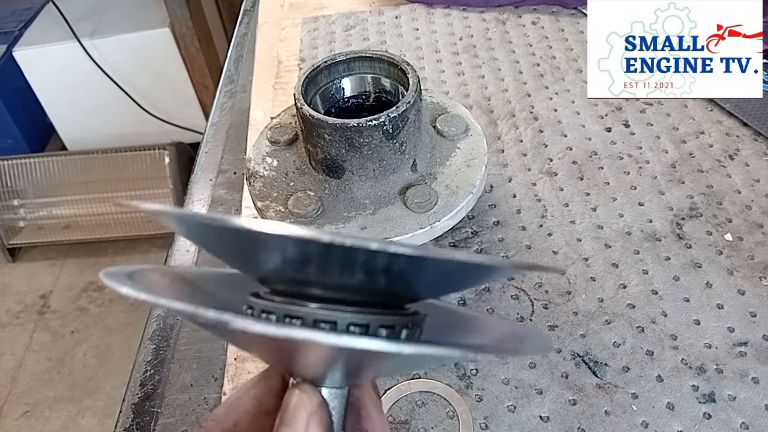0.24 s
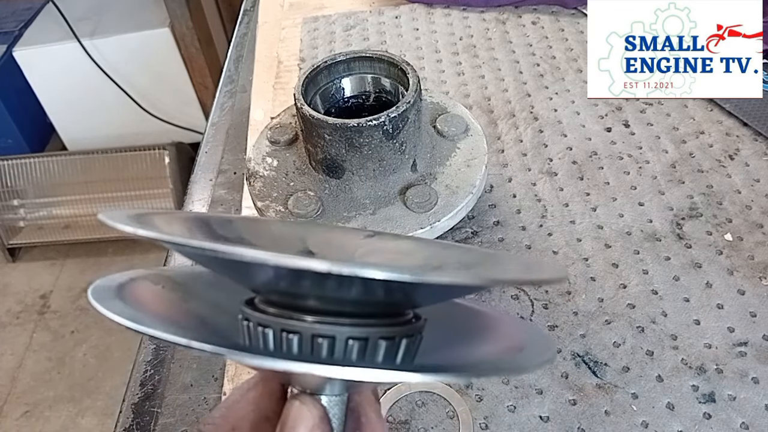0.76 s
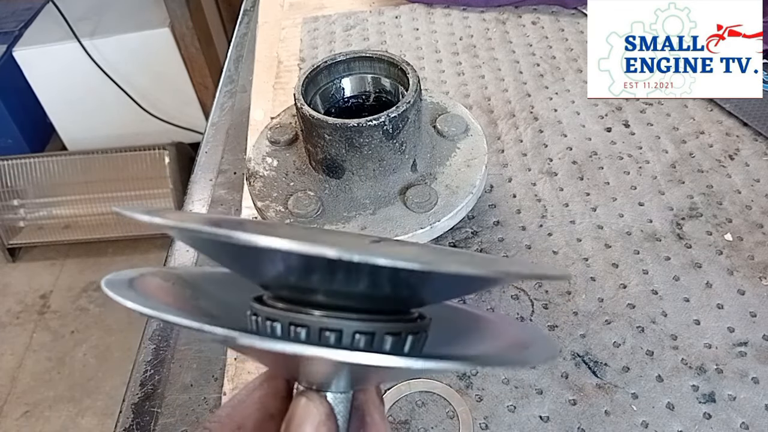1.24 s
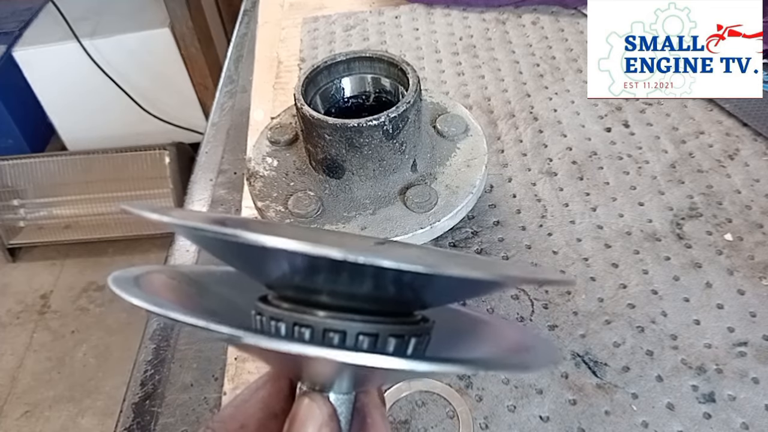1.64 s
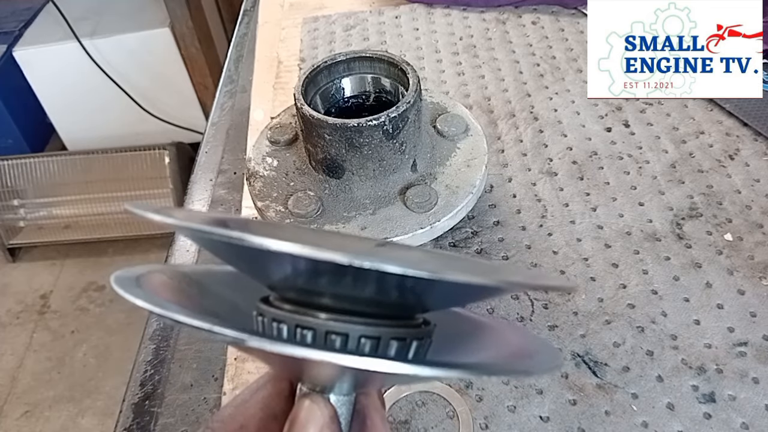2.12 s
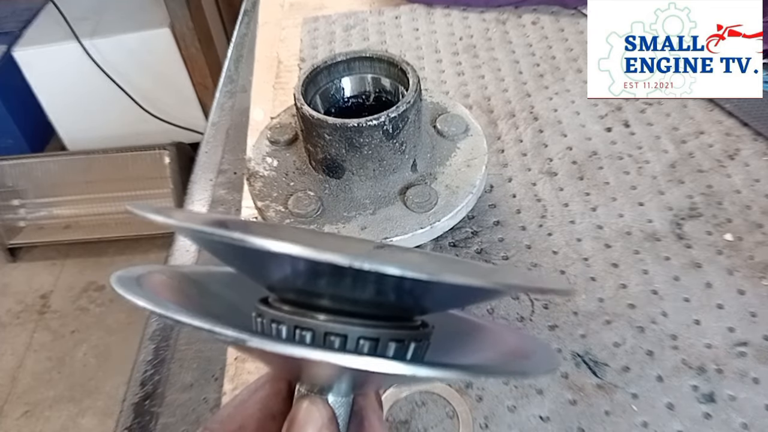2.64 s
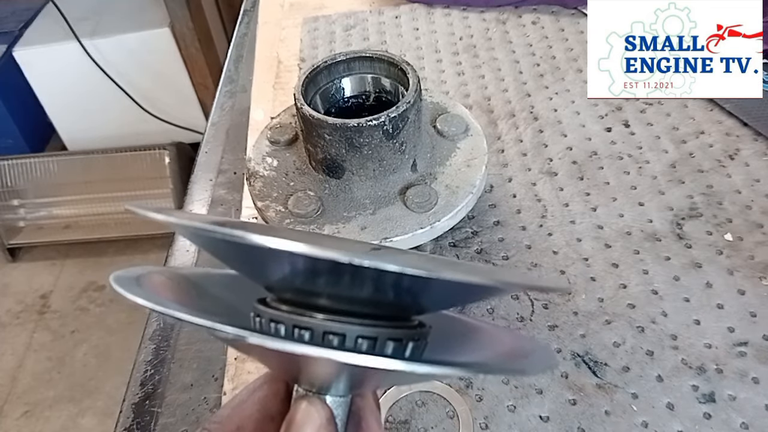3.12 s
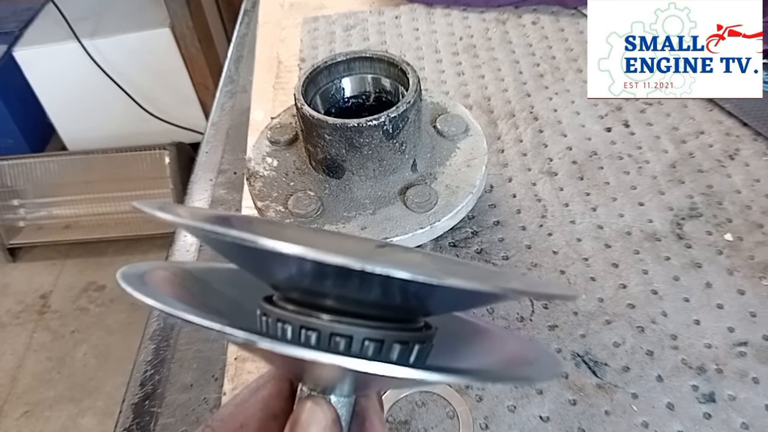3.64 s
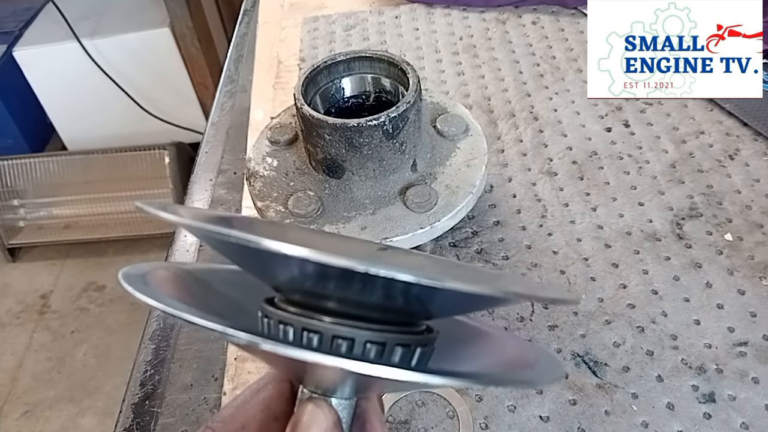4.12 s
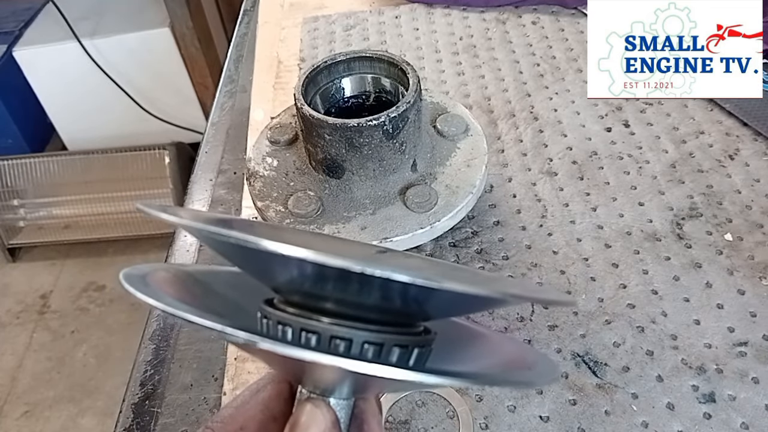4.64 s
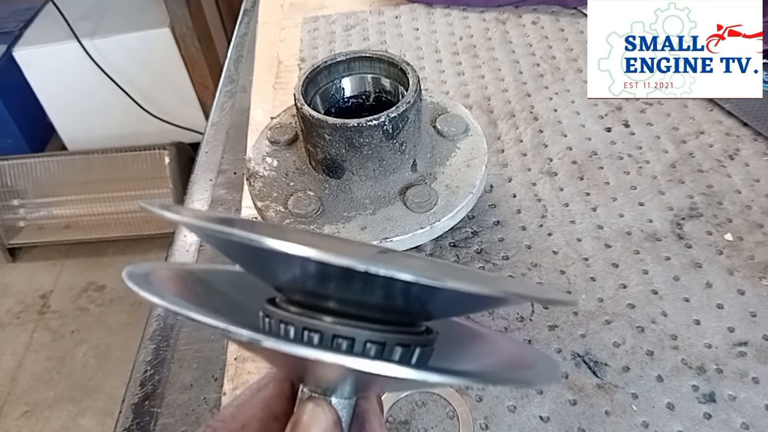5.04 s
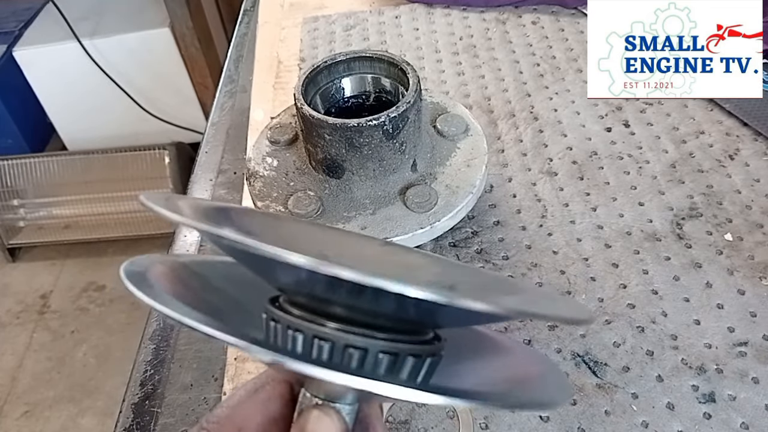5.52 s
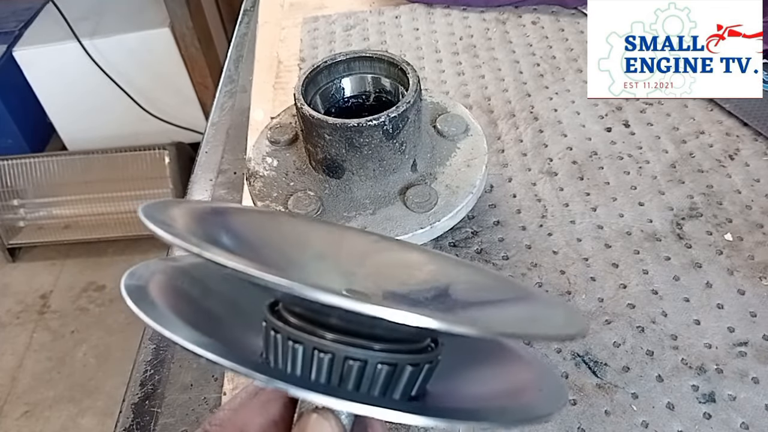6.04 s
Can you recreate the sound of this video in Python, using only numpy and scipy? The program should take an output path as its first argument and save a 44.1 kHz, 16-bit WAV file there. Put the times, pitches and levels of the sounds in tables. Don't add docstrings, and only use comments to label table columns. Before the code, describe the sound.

Four trigger pulls of an air-powered grease gun, hissing and hammering rhythmically, the third hardest, over a quiet shop hum and faint hose leak.

```python
import sys
import numpy as np
from scipy import signal
from scipy.fft import rfft, irfft, next_fast_len
from scipy.io import wavfile
from scipy.ndimage import uniform_filter1d

SR = 44100
rng = np.random.default_rng(int(sys.argv[2]) if len(sys.argv) > 2 else 0)


def gain_from_db(level_db):
    decades = np.asarray(level_db, float) / 20
    return 10 ** decades


def to_wav(s):
    ch = np.atleast_2d(s).T
    pcm = np.round(np.clip(ch, -1, 1) * 32767)
    wavfile.write(sys.argv[1], SR, pcm.astype(np.int16))


N = 276948
TIME = np.arange(N) / SR
EDGE_DB = 30
OPEN_S, SHUT_S = 0.005, 0.03


def curve(tables, column, rest):
    out = np.full(N, rest, float)
    for rows in map(np.array, tables):
        inside = slice(*np.searchsorted(TIME, rows[[0, -1], 0]))
        course = np.interp(TIME[inside], rows[:, 0], rows[:, column])
        out[inside] = np.maximum(out[inside], course)
    return out


def unit(x):
    return x / np.sqrt(np.mean(x ** 2))


def noise(spectrum):
    hz, db = np.transpose(spectrum)
    size = next_fast_len(N)
    bins_hz = np.maximum(np.arange(size // 2 + 1) * SR / size, 1)
    gain = gain_from_db(np.interp(np.log(bins_hz), np.log(hz), db, left=-99, right=-99))
    return unit(irfft(rfft(rng.standard_normal(size)) * gain, size)[:N])


def walk(rate_hz):
    held = int(SR / rate_hz)
    stairs = np.repeat(rng.standard_normal(N // held + 1), held)
    return unit(uniform_filter1d(uniform_filter1d(stairs, held), held)[:N])


def band(x, hz, width_hz):
    return signal.lfilter(*signal.iirpeak(hz, hz / width_hz, SR), x)


def band_twice(x, hz, width_hz):
    return band(band(x, hz, width_hz), hz, width_hz)


def ring(modes):
    t = TIME[:SR // 2]
    return [gain_from_db(db - 60 * t / t60) * np.sin(2 * np.pi * hz * t) for hz, db, t60 in modes]


def blows(times_s, sizes):
    out = np.zeros(N)
    np.add.at(out, (np.asarray(times_s) * SR).astype(int), sizes)
    return out


def through(x, response):
    return signal.fftconvolve(x, response)[:N]


def reflections(t60_s, start_s):
    t = TIME[:SR // 2]
    echoes = rng.standard_normal(len(t)) * gain_from_db(-60 * t / t60_s) * (t > start_s)
    return echoes / np.sqrt(np.sum(echoes ** 2))


def puffs(rows):
    shapes = []
    for s, rise, hold, fall, db in rows:
        shapes.append([(s - rise, db - EDGE_DB), (s, db), (s + hold, db),
                       (s + hold + 2 * fall, db - 2 * EDGE_DB)])
    return curve(shapes, column=1, rest=-120)


def flow_db(sizzle):
    # (open [s], shut [s], hiss at opening [dB], hiss at shutting [dB],
    # valve-seat sizzle over the hiss [dB])
    openings = [
        (1.071, 1.715, -27.5, -28, -9),
        (2.072, 2.906, -28.5, -30, -9),
        (2.945, 2.974, -36, -32, -18),
        (3.166, 3.57, -31.5, -32, -3.5),
        (3.556, 4.148, -26, -22, -4),
        (4.627, 4.932, -26, -34, -6.5),
        (4.936, 5.292, -32.5, -27, -8.5),
        (5.29, 5.506, -35, -37.5, -7),
    ]
    shapes = []
    for opened, shut, first_db, last_db, sizzle_db in openings:
        extra_db = sizzle * sizzle_db
        shapes.append([(opened - OPEN_S, first_db - EDGE_DB + extra_db), (opened, first_db + extra_db),
                       (shut, last_db + extra_db), (shut + SHUT_S, last_db - EDGE_DB + extra_db)])
    return curve(shapes, column=1, rest=-120)


def shop():
    # (frequency [Hz], level [dB/Hz])
    hum_colour = [(30, -16), (55, -6), (68, 4), (85, -15.5), (110, -19.5)]
    # (time [s], level [dB])
    hum_course = [(0, -40), (1, -46.5), (1.9, -54), (3.1, -44), (4.4, -54), (5.6, -46), (6.28, -54)]
    # (frequency [Hz], level [dB/Hz])
    murmur_colour = [(56, -36), (95, -0.5), (113, -10.5), (139, -6.5), (209, -9.5), (358, -20), (388, -21),
                     (692, -22), (2200, -34.5), (2860, -63), (4840, -120)]
    # (frequency [Hz], level [dB/Hz])
    leak_colour = [(1180, -52.5), (2000, -19.5), (2400, -18), (2570, -9), (2780, -12), (3260, -3.5),
                   (3550, -9), (3870, -8), (5490, -16.5), (6880, -10.5), (7570, -15), (8630, -2.5),
                   (10800, -21.5), (13000, -13), (16000, -16.5)]
    murmur_db, leak_db = -48, -45
    duck_db, duck_s = -8, 0.21
    busy = uniform_filter1d(1.0 * (flow_db(False) > -2 * EDGE_DB), int(duck_s * SR))
    hum_db = curve([hum_course], column=1, rest=-120) + duck_db * busy + 1.9 * walk(5.6)
    hum = gain_from_db(hum_db) * noise(hum_colour)
    murmur = gain_from_db(murmur_db - 1.5 + 1.3 * walk(6.2)) * noise(murmur_colour)
    hiss = noise(leak_colour)
    leak = unit(hiss + 0.68 * through(hiss, reflections(0.053, 0.00084)))
    return hum + murmur + gain_from_db(leak_db + 0.14 * walk(2.78)) * leak


def air(chuff):
    # (time [s], hold [s], fall [s], level [dB])
    drains = [
        (0.797, 0.25, .05, -49),
        (1.74, .01, 0.48, -35),
        (1.834, .01, 0.32, -32.5),
        (2.89, .01, .15, -29),
        (2.97, .01, 0.72, -38.5),
        (4.157, 0.0081, 0.58, -35),
        (5.298, .2, .07, -30.5),
        (5.51, .01, 0.28, -42.5),
    ]
    # (frequency [Hz], level [dB/Hz])
    nozzle_colour = [(1100, -16), (2200, -7.5), (2750, -2.5), (4200, 0.5), (5300, -2.5), (5750, -6.5),
                     (8600, -6), (14000, -26)]
    # (time [s], level [dB])
    spits = [
        (1.076, -14),
        (2.076, -19),
        (3.17, -16.5),
        (4.627, -18.5),
    ]
    # (frequency [Hz], level [dB/Hz])
    spit_colour = [(3600, -25), (4500, -2.5), (5500, -7.5), (7200, -2.5), (8000, -16)]
    # (peak [s], rise [s], hold [s], fall [s], hiss [dB])
    surges = [
        (1.074, .005, 0.081, 0.16, -19.5),
        (1.693, 0.18, 0.0066, 0.17, -24.5),
        (2.075, .005, 0.011, .4, -20.5),
        (2.87, 0.038, 0.0026, .08, -18.5),
        (3.169, 0.0054, .03, 0.21, -21),
        (4.095, 0.041, 0.063, .022, -29),
        (4.627, .005, 0.009, 0.15, -21),
        (5.255, .015, 0.028, 0.035, -25.5),
    ]
    # (frequency [Hz], level [dB/Hz])
    fine_colour = [(2940, -22.5), (5000, -5.5), (5650, -9), (6630, -7.5), (6760, -7), (7790, -3),
                   (8090, -1), (8790, 0), (10200, -10.5), (14900, -12), (16000, -9.5)]
    # (frequency [Hz], level [dB/Hz])
    roar_colour = [(1000, -12), (1700, -7), (2050, -3), (2650, -0.5), (2870, -1.5), (3830, 1), (4890, -3.5),
                   (5600, -33), (7280, -32), (12300, -120)]
    # (frequency [Hz], level [dB/Hz])
    breath_colour = [(150, -25), (300, 0.5), (700, -0.5), (1200, 1), (2000, -16.5), (2600, -42)]
    sizzle_colour = [(7000, -19), (7900, -11.0), (8600, 1), (9300, -6.5), (10000, -30.5)]

    steady, surge = gain_from_db(flow_db(False)), gain_from_db(puffs(surges))

    def strength(steady_db, surge_db):
        return np.hypot(steady * gain_from_db(steady_db), surge * gain_from_db(surge_db))

    drain_db = puffs([(s, SHUT_S, hold, fall, db) for s, hold, fall, db in drains])
    drain = gain_from_db(drain_db + 1.6 * walk(25.03)) * noise(nozzle_colour)
    spit_db = puffs([(s, OPEN_S, 0.011, 0.026, db) for s, db in spits])
    spit = gain_from_db(spit_db) * noise(spit_colour)
    fine = strength(0, 0) * gain_from_db(1.0 * walk(40)) * noise(fine_colour) * (0.85 + 0.5 * chuff)
    roar = strength(-2.5, -5.5) * gain_from_db(1.2 * walk(30)) * noise(roar_colour) * (0.77 + 1.24 * chuff)
    breath = strength(-12, -13) * gain_from_db(0.96 * walk(30)) * noise(breath_colour) * (0.61 + 2.0 * chuff)
    seat = np.hypot(gain_from_db(flow_db(True)), surge * gain_from_db(-12))
    sizzle = seat * gain_from_db(0.63 * walk(40)) * noise(sizzle_colour)
    return fine + roar + breath + sizzle + drain + spit


def choke_db():
    lock_s, rise_s, hold_s, fall_s, damping_db = 4.165, 0.06, 0.4, 0.01, -18
    return damping_db * gain_from_db(puffs([(lock_s, rise_s, hold_s, fall_s, 0)]))


def piston():
    # (time [s], knock [dB], barrel ring [dB], return blow after [s])
    strokes = [(1.07, -19, -28, 0.07), (1.533, -25, -32.5, 0.045), (2.0718, -32, -27, 0.046),
               (2.2126, -23, -26.5, .048), (2.3456, -13, -27, .042), (2.4811, -13.5, -29.5, 0.037),
               (2.6154, -16, -27, .042), (2.7525, -12.5, -27, 0.044), (2.936, -10, -27.5, 0.037),
               (3.1672, -37, -20, .042), (3.311, -14.5, -28.5, .048), (3.4398, -15, -26, 0.051),
               (3.5694, -1.5, -17.5, 0.042), (3.7, 0.5, -15.5, 0.042), (3.8301, -2.5, -15.5, 0.042),
               (3.9612, -1, -15.5, 0.04), (4.0913, -2, -18.5, .0425), (4.628, -12, -23, .043),
               (4.7669, -12.5, -32, 0.043), (4.8951, -14.5, -30, 0.04), (5.0255, -11.5, -29, 0.038),
               (5.1563, -14, -27, 0.041)]
    # (time [s], barrel ring [dB])
    coasting = [(1.666, -35), (1.801, -38), (1.935, -42), (3.067, -33), (4.221, -44), (4.351, -47.5),
                (4.482, -48), (5.286, -59), (5.496, -43.5)]
    # (frequency [Hz], level [dB], t60 [s])
    barrel_modes = [(154.5, 0, .26), (129, -5, .14), (225, -18, .24)]
    # (frequency [Hz], level [dB], t60 [s])
    head_modes = [(1193, -10.5, 0.049), (1408, -2.5, 0.032), (1900, -17, 0.0072), (2546, 0, 0.027),
                  (3123, -6.5, 0.018), (3720, -4.5, 0.014), (4420, -9, 0.022)]
    coast_return_s = 0.048

    s, knock_db, ring_db, after = np.transpose(strokes)
    late, late_db = np.transpose(coasting)
    low, lower, upper = ring(barrel_modes)
    barrel_ring = -1.6 * (low - lower + upper)
    push = blows(s, gain_from_db(ring_db)) + blows(s + after, gain_from_db(ring_db))
    coast = blows(late, gain_from_db(late_db)) + blows(late + coast_return_s, gain_from_db(late_db))
    barrel = through(push, barrel_ring) * gain_from_db(choke_db()) + through(coast, barrel_ring)

    t = TIME[:SR // 10]
    chatter = blows([0, 0.0038, 0.0076], [1, 0.7, 0.5])[:len(t)]
    knocks = blows(s, -gain_from_db(knock_db)) + blows(s + 0.026, 0.16 * gain_from_db(knock_db))
    grit = through(np.abs(knocks), np.exp(-t / 0.0048)) * rng.standard_normal(N)
    head = through(through(knocks, chatter), 0.32 * sum(ring(head_modes)))
    head = head + 0.9 * band_twice(grit, 2200, 3500) + 0.75 * band_twice(grit, 9500, 2500)

    thud_pulse = 2.9 * np.exp(-t / 0.00094) * np.sin(2 * np.pi * 330 * t)
    thud = through(blows(s, -gain_from_db(ring_db)), thud_pulse)
    chuff = through(blows(s, 0.75), np.exp(-t / 0.044))
    body = signal.sosfilt(signal.butter(2, 95, "high", fs=SR, output="sos"), barrel + thud)
    return body, head, chuff


def whistle():
    # (start [s], length [s], first pitch [Hz], last pitch [Hz], peak [dB])
    whistles = [
        (1.11, .21, 8100, 6940, -21.5),
        (1.686, 0.047, 5250, 6040, -29),
        (2.097, 0.046, 7590, 5410, -20.5),
        (3.205, .04, 7100, 5850, -23),
        (4.641, .025, 8140, 8000, -18),
    ]
    edge_s, knee_share, sag_share = 0.022, 0.45, 0.22
    knee_db, end_db = -13, -13.5
    glides = []
    for s, length, first_hz, last_hz, db in whistles:
        knee_hz = first_hz + sag_share * (last_hz - first_hz)
        end = s + length
        glides.append([(s - edge_s, first_hz, db - EDGE_DB), (s, first_hz, db),
                       (s + knee_share * length, knee_hz, db + knee_db),
                       (end, last_hz, db + end_db), (end + edge_s, last_hz, db + end_db - EDGE_DB)])
    pitch_hz = curve(glides, column=1, rest=0) * (1 + 0.02 * walk(220))
    phase = 2 * np.pi * np.cumsum(pitch_hz) / SR
    flutter = 2.4 * walk(420) * np.cos(phase) + (0.5 + 1.23 * walk(380)) * np.sin(phase)
    return gain_from_db(curve(glides, column=2, rest=-120)) * 1.44 * flutter


def eddies(rate_hz, spread_db):
    chance = rng.random((3, N))
    size = np.minimum(-np.log(1 - chance[2]), 3.5)
    return (chance[0] < rate_hz / SR) * np.sign(chance[1] - 0.6) * gain_from_db(spread_db * size)


def slaps():
    # (peak [s], rise [s], hold [s], fall [s], level [dB])
    gust_rows = [(1.138, 0.065, 0.0084, 0.028, -16.5), (1.17, .025, .002, .04, -8),
                 (1.197, 0.0128, .006, 0.055, -7.5), (1.21, .01, 0.049, .1, -12.5),
                 (1.25, .015, 0.011, 0.12, -10.5), (1.3, .06, 0.032, 0.084, -8.5),
                 (1.375, .01, .13, 0.043, -27.5), (1.686, 0.051, 0.019, 0.033, -14.5),
                 (1.718, .01, 0.0015, 0.0097, -17), (2.113, .03, 0.0017, 0.045, -2.5),
                 (2.142, .01, .002, 0.1, -14), (2.87, .01, .012, 0.018, -17),
                 (3.201, 0.0092, 0.031, 0.011, -9.5), (3.237, .01, .002, 0.18, -28.5),
                 (4.129, .024, 0.0022, 0.016, -16), (4.655, 0.035, 0.017, 0.0096, -8.5),
                 (4.678, .02, 0.0015, 0.055, -6.5), (4.726, .02, 0.0018, .12, -26.5),
                 (5.256, 0.016, .012, 0.029, -15)]
    # (time [s], pressure step [full scale])
    lone_slaps = [(1.134, -1.1), (1.1513, -0.5), (1.173, 0.77), (1.2277, -0.78), (1.3641, -0.63),
                  (1.3775, -0.64), (1.4257, -0.53), (1.4531, 0.33), (1.4717, -0.62), (1.5048, -0.41),
                  (1.6777, -0.67), (1.704, -0.86), (1.72, 0.49), (2.1098, -1.1), (2.1383, 1), (2.1517, 1),
                  (2.1657, -0.57), (2.186, -0.49), (2.8739, 1), (2.8788, -0.59), (3.222, 0.66),
                  (3.2311, -0.47), (3.254, -0.38), (3.281, -0.26), (4.1289, -0.72), (4.6583, -1.06),
                  (4.679, -1.17), (4.7308, -0.42), (5.2581, -0.45), (5.2672, -0.43)]
    rumble_colour = [(45, -12), (80, -21.5), (200, 2), (600, -2.5), (2000, -20.5)]
    crackle_db, middling_db = -8.5, -4.5

    gust = gain_from_db(puffs(gust_rows) + 1.82 * walk(140))
    t = TIME[:SR // 20]
    quick = np.exp(-t / 0.00033) - 0.45 * np.exp(-t / 0.00089)
    slow = 0.62 * np.exp(-t / 0.0026) * np.cos(2 * np.pi * 125 * t) + 0.41 * np.exp(-t / 0.0011)
    small = 0.63 * unit(through(eddies(450, 3.37), quick)) + 0.45 * noise(rumble_colour)
    flicker = gain_from_db(crackle_db + 2.5 * walk(250))
    crackle = flicker * 0.86 * unit(band(eddies(2500, 5.3), 2650, 2800))
    middling = gain_from_db(middling_db) * gust * eddies(130, 3.0)
    large = through(blows(*np.transpose(lone_slaps)) + middling, slow)
    port = gust * (small + crackle) + large
    return signal.sosfilt(signal.butter(6, 5000, fs=SR, output="sos"), port)


def vent():
    # (frequency [Hz], width [Hz], level [dB])
    tube_modes = [(2560, 720, -3.5), (3860, 850, -15), (5900, 1500, -15), (8100, 830, -9)]
    centre_s, length_s, level_db = 1.82, 0.052, -19.5
    puff = rng.standard_normal(N)
    tube = unit(sum(gain_from_db(db) * band_twice(puff, hz, width_hz) for hz, width_hz, db in tube_modes))
    return gain_from_db(level_db) * tube * np.exp(-np.abs((TIME - centre_s) / (length_s / 2)) ** 3)


def scene():
    bench_t60_s, bench_db = 0.06, -10
    room_t60_s, room_db = 0.58, -14
    blast_db = -14.5
    choke_share = 0.86
    barrel, head, chuff = piston()
    gun = head + air(chuff) + whistle() + vent()
    gusts = slaps()
    bench = gain_from_db(bench_db) * through(gun, reflections(bench_t60_s, 0.00043))
    echo = through(gun + gain_from_db(blast_db) * gusts, reflections(room_t60_s, 0.0049))
    walls = gain_from_db(room_db + choke_share * choke_db()) * echo
    return (0.83 * (gun + bench) + walls + barrel + gusts + shop())[None]


def top_cut(x):
    return signal.sosfilt(signal.butter(12, 16800, fs=SR, output="sos"), x)


def record(dry):
    ceiling, top_hz = 0.93, 15550
    x = signal.sosfilt(signal.butter(4, 60, "high", fs=SR, output="sos"), dry)
    x = ceiling * np.tanh(x / ceiling)
    x = signal.sosfilt(signal.ellip(10, 0.2, 80, top_hz, fs=SR, output="sos"), x)
    return top_cut(x)


dry = scene()
out = record(dry)
to_wav(out)
```